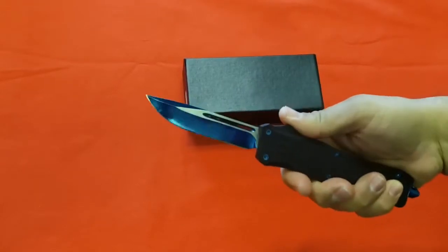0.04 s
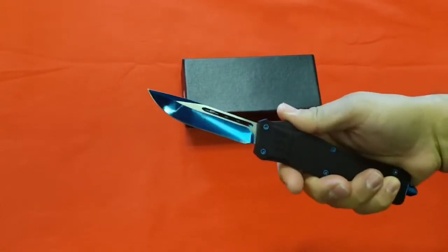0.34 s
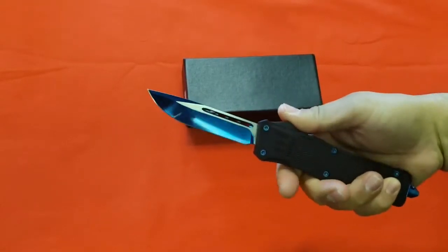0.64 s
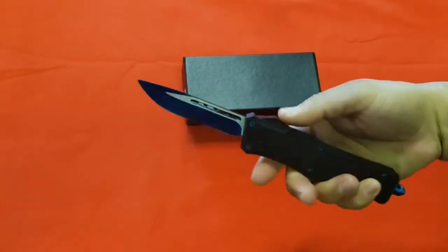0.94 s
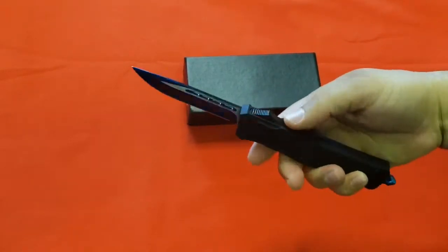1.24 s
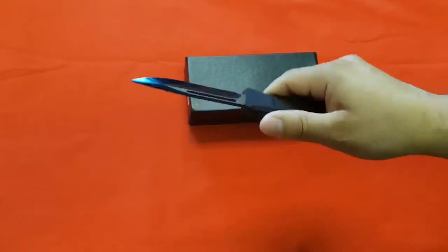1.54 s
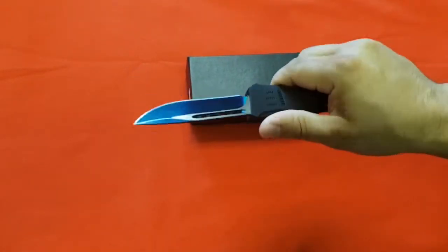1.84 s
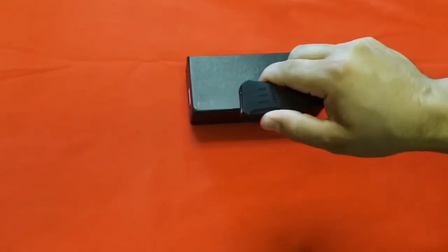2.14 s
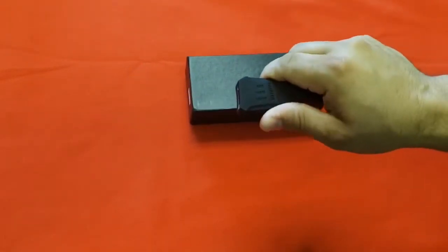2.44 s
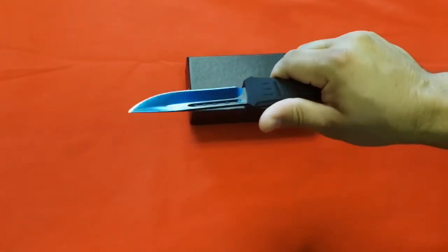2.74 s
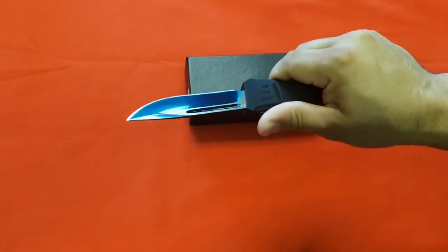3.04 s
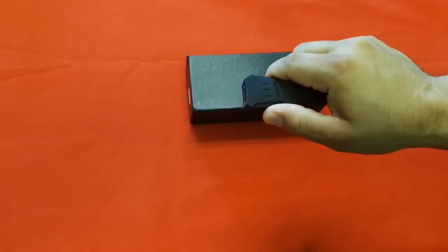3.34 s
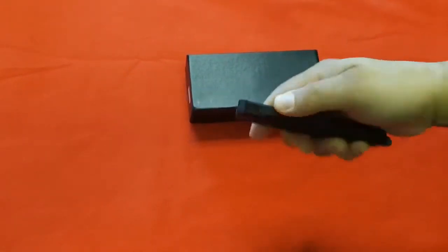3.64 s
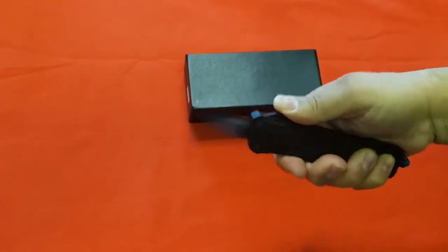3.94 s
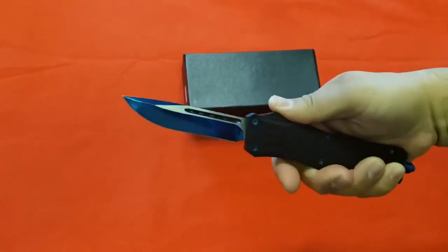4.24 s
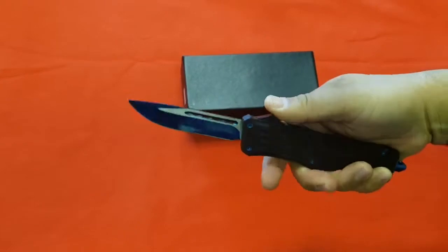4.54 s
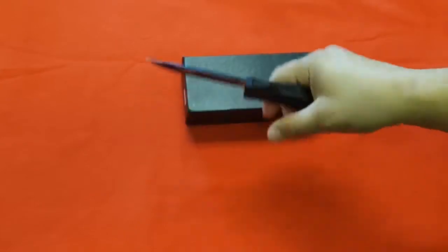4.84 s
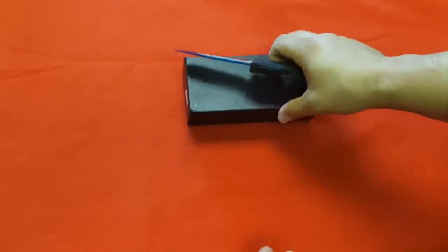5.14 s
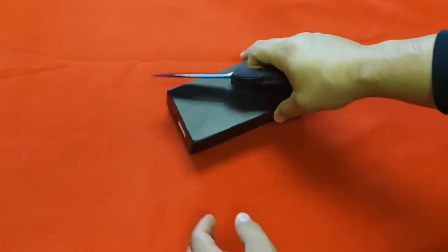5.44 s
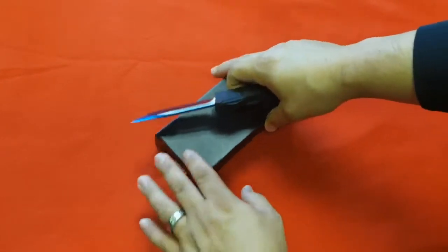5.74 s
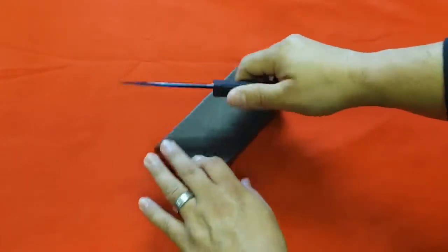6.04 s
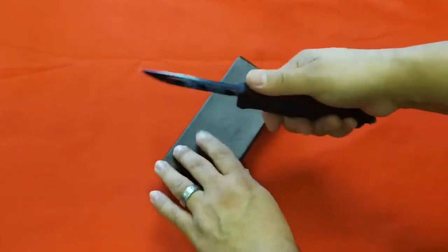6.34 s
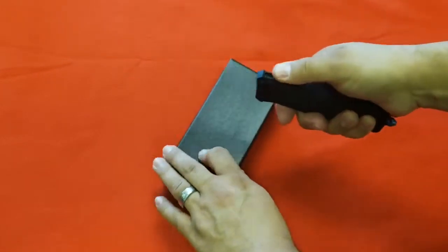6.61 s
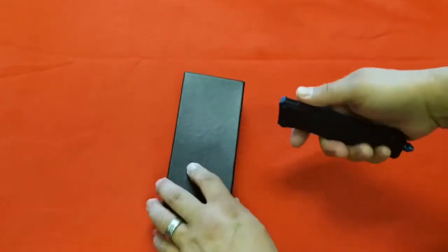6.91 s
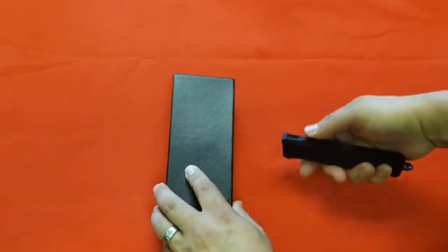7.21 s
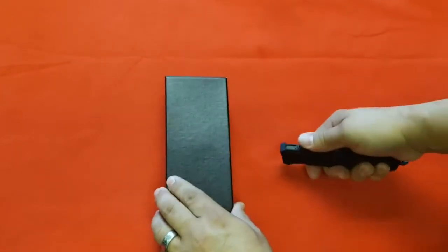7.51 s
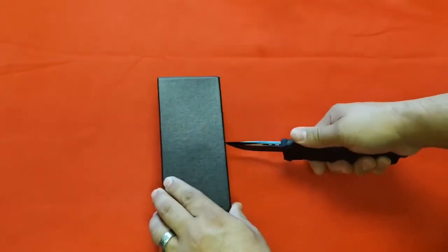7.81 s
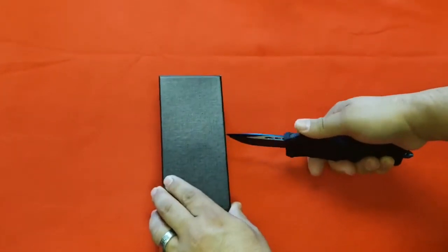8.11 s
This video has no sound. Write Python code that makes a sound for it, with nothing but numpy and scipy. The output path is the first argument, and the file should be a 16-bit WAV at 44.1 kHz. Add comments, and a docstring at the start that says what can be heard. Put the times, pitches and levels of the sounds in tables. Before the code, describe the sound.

A spring-loaded knife clicks once, close and left of centre. After a pause it snaps shut and open four times in all, each a sharp double click with a brief metallic ring. A cardboard box is softly bumped and slid over a cloth-covered table, with another snap midway. Finally the blade shoots into the box with a loud, hollow knock. The small room is quiet, with a low hum.

```python
"""A small, quiet room with a low hum; a stereo microphone close to a cloth-covered table, a bird far outside.
A spring-driven knife snaps, left of centre, and from 2 s is flicked open and shut four times: a latch
lets go, the blade grazes its channel and some 30 ms later bounces into its stop; spring and blade ring on.
From 5 s a cardboard box is knocked and shoved round on the cloth, with one more stroke in between.
At 7.8 s the last stroke shoots the blade into the box."""
import sys
import numpy as np
from scipy import signal
from scipy.fft import rfft, irfft, next_fast_len
from scipy.io import wavfile
from scipy.ndimage import uniform_filter1d

SR = 44100
rng = np.random.default_rng(int(sys.argv[2]) if len(sys.argv) > 2 else 0)


def output_pcm(signal):
    """Save a mono or channel-first signal as 16-bit PCM at the path in sys.argv[1].

    Samples are clipped to [-1, 1] before scaling.
    """
    pcm = np.clip(np.atleast_2d(signal).T, -1, 1) * 32767
    wavfile.write(sys.argv[1], SR, np.round(pcm).astype(np.int16))


N = 364707
LEAD = 4410  # samples ahead of time zero, for blows already sounding at the start
T = np.arange(SR // 2) / SR  # time axis of one blow [s]
GLIDE_ATTACK_S, GLIDE_RELEASE_S = 0.065, 0.45

# the spring launches the blade: (time [s], level [dB], low clack [dB], handle kick [dB],
# delay of the graze [s], graze [dB])
LAUNCHES = [(2.1181, -9, -3.5, -50, 0.018, -16.5), (2.7057, -8, -5.5, -44, 0.026, -19),
            (3.348, -8, -0.5, -43.5, 0.019, -21.5), (4.0143, -8, -1, -38.5, 0.024, -17),
            (6.645, -7, 1.5, -51.5, 0.019, -12.5), (7.7816, -11.5, 3, -48.5, 0.011, -24)]
# the blade hits its stop: (time [s], level [dB], loss per bounce [dB], low clack [dB], top sheen [dB],
# spring buzz [dB], free blade ring [dB], sheathed ring [dB], recoil [dB], handle note [Hz], handle [dB])
STOPS = [(-.003, -22, 2.7, -9.5, 2, -27, -66, -63.5, -48.5, 2183, -48.5),
         (2.1492, -8, 6.5, 0.5, -1, -21.5, -58.5, -54, -35.5, 1952, -32.5),
         (2.742, -12, 8.5, -0.5, 0.2, -27, -64, -45.5, -38, 2190, -40),
         (3.3764, -10, 4, 0.5, 2, -23.5, -69.5, -58, -38.5, 1883, -29.5),
         (4.0485, -5, 7.5, -3.5, -5.5, -27, -39.5, -61.5, -32, 2510, -31),
         (6.674, -14, 2.4, 4.5, 3.5, -20.5, -66.5, -49, -37.5, 2250, -39),
         (7.7991, -26.5, 3.5, 12, 3.2, -42.5, -66.5, -62, -49, 2100, -29.5)]
# crowded resonances of handle and slide: (frequency [Hz], gain [dB])
FRAME = [(60, -18.5), (200, -19.5), (600, -26), (1300, -29.5), (2000, -15.5), (2700, -14.5), (3700, -29),
         (4300, -16), (4850, 0.5), (5800, -1), (6900, 4), (8200, -20.5), (9300, -12.5), (12500, -6.5)]
# the microphone's right port faces away from the knife: (frequency [Hz], gain [dB])
SHADOW = [(150, -12), (1000, -11), (2100, -13), (2700, -14), (3900, 2.5), (4700, -4), (5600, -14.5),
          (6900, -19), (8200, -0.5), (9400, -3.5), (12000, -3)]


def knife():
    """Close up, on the left: steel cracks, each stop sets the parts ringing, the hand takes the recoil."""
    out = cracks()
    for s, *_, spring_db, blade_db, sheathed_db, recoil_db, handle_hz, handle_db in STOPS:
        buzz = amp(spring_db) * spring_buzz()
        steel = blade_ring(blade_db, sheathed_db)
        clack = amp(handle_db) * handle_clack(handle_hz)
        recoil = amp(recoil_db) * thump(hz=60.3, t60=0.11, pan_db=16.5)
        add(out, s, buzz + pan(5.7) * (steel + clack) + recoil)
    for s, _, _, kick_db, *_ in LAUNCHES:
        scrape = blow(colour(pair(len(T), .25) * fade(.012), FRAME))
        add(out, s - .005, amp(-35.5) * pan(5.8) * scrape)  # the latch slips off its seat first
        add(out, s, amp(kick_db) * thump(hz=81, t60=0.084, pan_db=11))
    return out


def cracks():
    """Each steel contact cracks through the hand-damped frame."""
    out = np.zeros((2, N + LEAD))
    for s, db, clack_db, sheen_db in contacts():
        strike = pair(len(T), 0.37) * fade(0.0047) + amp(-6.5) * crowd(count=36) * fade(.028)
        strike *= 1 - fade(0.0031)
        crack = blow(colour(strike[:, :SR // 12], FRAME))
        tone = [(3000, clack_db), (4500, 0.0016), (7500, 0), (11000, sheen_db)]
        add(out, s, amp(db) * colour(crack, tone))
    out[1] = colour(out[1], SHADOW)
    return out


def contacts():
    """Every touch of steel on steel: (time [s], level [dB], low clack [dB], top sheen [dB])."""
    for s, db, clack_db, _, graze_s, graze_db in LAUNCHES:
        yield s - .002, db - 7, -4, 3  # the latch tips
        yield from bounces(s, db, loss_db=11, clack_db=clack_db, sheen_db=-3, count=3)
        yield s + graze_s, graze_db, 4, 1.5  # the blade grazes its channel
    for s, db, loss_db, clack_db, sheen_db, *_ in STOPS:
        yield from bounces(s, db, loss_db, clack_db, sheen_db, count=5)


def bounces(s, db, loss_db, clack_db, sheen_db, count):
    """A blow and its rebounds, each weaker and duller than the last, at shrinking gaps."""
    first_gap_s, shrink, jitter_s, duller_db = .0038, .9, .0003, 1.17
    for k in range(count):
        yield s, db - k * loss_db, clack_db + k * duller_db, sheen_db
        s = s + first_gap_s * shrink ** k + jitter_s * rng.standard_normal()


def spring_buzz():
    """The coils ring and chatter in their channel, which roughens the sound."""
    # resonances of the spring: (frequency [Hz], gain [dB])
    spring_spectrum = [(100, -26), (700, -15.5), (1300, -20), (2100, -12.5), (3100, -23), (4000, -9),
                       (4800, -8), (5700, -6.5), (7000, 5.5), (8200, -16), (10000, -11.5), (12000, 0),
                       (13000, -9)]
    chatter = amp(2.5 * walk(180)[:len(T)])
    coils = (crowd(count=240) + 0.58 * pair(len(T), 0.095)) * chatter
    buzz = unit(colour(coils, spring_spectrum)) * fade(0.19) * (1 - fade(0.041))
    buzz[1] = colour(buzz[1], [(hz, 0.39 * db) for hz, db in SHADOW])  # only partly shadowed
    return buzz


def blade_ring(free_db, sheathed_db):
    """The struck blade rings on in long steel modes."""
    # modes of the blade, free and sheathed: (frequency [Hz], level [dB], t60 [s])
    free_modes = [(2178, -4, 0.52), (2220, -9.5, .4), (2360, -15, 0.56), (3390, -11.5, 0.16),
                  (4550, -9, 0.19), (4960, -13, .25), (6541, 6, .15), (11700, -2.5, .15)]
    sheathed_modes = [(4355, -11, 0.38), (4870, -14, 0.27), (7000, 3, .16), (10900, 1, .12),
                      (10400, 5.5, .1), (12400, -0.5, .17), (12820, -3, .15)]
    free = amp(free_db) * ring(free_modes, scatter_db=1.2, spread_rad=0.52)
    return free + amp(sheathed_db) * ring(sheathed_modes, scatter_db=2.5, spread_rad=1)


def handle_clack(hz):
    """The handle's hollow note, whose pitch depends on the grip."""
    return blow(colour(pair(len(T), 0.27) * fade(0.044), [(0.76 * hz, -40), (hz, 0), (1.5 * hz, -40)]))


def thump(hz, t60, pan_db):
    """The hand takes a jolt: a few slow swings and a dull thud of flesh."""
    flesh = [(50, -11), (110, -2), (190, -0.5), (300, -12.5), (650, -14), (1100, -35.5)]
    thud = unit(colour(pair(len(T), 0.29), flesh))
    swings = np.sin(2 * np.pi * hz * T) * fade(t60)
    return pan(pan_db) * (swings + amp(-4) * thud * fade(0.039))


def box_knocks():
    """Blade, handle and fingers hit the box, which answers with a short crack and its hollow modes."""
    # blows on the box: (time [s], level [dB], brightness [dB/octave], hollow ring re the crack [dB])
    box_blows = [(5.15, -62.5, 0, -6), (5.187, -41, -3.5, -3.5), (5.4913, -61, -0.5, -2),
                 (6.3517, -46, 1.5, -5), (6.4747, -48.5, -2, -7.5), (7.44, -55.5, -4.5, -3),
                 (7.4943, -45.5, 0.5, -8), (7.522, -59, 2.5, -12), (7.7982, -12.5, 1.5, -9),
                 (7.802, -8.5, 0.5, -3.5), (7.8064, -18, 1, -10), (7.824, -23, -1, -18)]
    # dull knock of cardboard: (frequency [Hz], gain [dB])
    card_spectrum = [(25, -33.5), (70, -13.5), (170, 2), (300, 3.5), (470, 0.5), (750, -4.5), (1200, -5.5),
                     (1700, -15), (2600, -18.5), (4000, -26.5), (8000, -39), (13000, -50.5)]
    # modes of the box: (frequency [Hz], level [dB], t60 [s])
    box_modes = [(173, -0.5, 0.13), (209, -5.5, 0.14), (374, -8.5, .08), (474.6, 1, 0.11), (604, -12, 0.18),
                 (792, -3, 0.069), (1167, -2.5, 0.093), (1340, -15, 0.11), (1570, -4.5, 0.038),
                 (1870, -12.5, 0.038), (2150, -5, 0.051), (2590, -17, 0.045)]
    out = np.zeros((2, N + LEAD))
    for s, db, tilt_db, hollow_db in box_blows:
        crack = blow(colour(pair(len(T), .92) * fade(0.02), card_spectrum))
        body = amp(hollow_db) * blow(ring(box_modes, scatter_db=0.94, spread_rad=0.11))
        add(out, s, amp(db) * colour(crack + body, [(125, -2 * tilt_db), (8000, 4 * tilt_db)]))
    right_port = [(200, -6), (500, -2), (650, -1), (850, -9.5), (1200, -20.5), (2500, -17), (6000, -2.5)]
    out[1] = colour(out[1], right_port)
    return colour(out, [(30, -19.5), (70, -3.5), (110, -0.5)])  # a small box radiates little bass


def sliding():
    """Card catches and slips on the weave in uneven grains, over a soft hiss of cloth."""
    # the box is shoved: (start [s], length [s], hollow rub [dB], rasp [dB])
    shoves = [(5.19, .11, -60, -81.5), (5.84, .045, -63.5, -80), (6.222, .06, -57, -59.5),
              (6.347, .015, -59.5, -63), (6.465, .025, -61.5, -77), (6.56, .045, -60, -63),
              (6.81, .025, -56.5, -61.5), (7.44, .05, -73.5, -83)]
    # sleeve, hand and box glide on the cloth: (start [s], length [s], hiss [dB], rasp [dB])
    glides = [(5.237, .1, -79.5, -86.5), (5.398, 0.5, -74.5, -88.5), (6.01, .02, -80.5, -87),
              (6.11, .16, -72.5, -80.5), (6.443, 0.25, -71.5, -78.5), (6.742, 0.21, -71, -74.5),
              (7.267, 0.048, -76.5, -79), (7.44, 0.071, -74.5, -87.5)]
    # the box's hollow rub, the card's rasp and the cloth's hiss: (frequency [Hz], gain [dB])
    rub_spectrum = [(100, -23.5), (220, -2.5), (380, 2.5), (480, 1.5), (600, -13.5), (900, -20.5),
                    (2000, -45)]
    rasp_spectrum = [(300, -24.5), (700, -2), (950, 0), (1500, -5.5), (2400, -2), (3000, -11.5),
                     (3800, -20.5), (5000, -20.5), (9000, -39)]
    cloth_spectrum = [(1180, -35.5), (2000, -3.5), (4300, -11), (6670, 7), (7420, -4), (8590, -27),
                      (10400, -13), (12500, -1.5), (13300, -8.5), (14000, -39)]
    rubbing, rasping, hissing = np.zeros((3, N))
    for s, length, rub_db, rasp_db in shoves:
        push = swell(s, length, attack_s=0.016, release_s=0.11)
        rubbing += amp(rub_db) * push
        rasping += amp(rasp_db) * push
    for s, length, hiss_db, rasp_db in glides:
        glide = swell(s, length, GLIDE_ATTACK_S, GLIDE_RELEASE_S)
        hissing += amp(hiss_db) * glide
        rasping += amp(rasp_db) * glide
        rubbing += amp(-79.5) * glide
    slips = amp(2.5 * walk(220))
    rub = unit(colour(pair(N, 0.95) * slips, rub_spectrum)) * rubbing
    rasp = unit(colour(pair(N, 0.34) * slips, rasp_spectrum)) * rasping
    hiss = unit(colour(pair(N, 0.14) * amp(1.5 * walk(40)), cloth_spectrum)) * hissing
    return pan(1.3) * (rub + rasp) + pan(2.7) * hiss


def table_rumble():
    """The table rumbles under the hands, in phase at both ports."""
    # course of the rumble: (time [s], level [dB])
    rumble_levels = [(5.1, -90), (5.3, -65.5), (5.9, -58.5), (6.1, -67), (6.5, -52.5), (6.9, -63),
                     (7.3, -70.5), (7.5, -55), (7.6, -83)]
    level = amp(np.interp(np.arange(N) / SR, *np.transpose(rumble_levels)))
    tabletop = [(30, -12), (70, -5), (100, 4), (150, -11), (300, -34.5), (600, -61)]
    return pan(1.3) * level * unit(colour(pair(N, 1), tabletop))


def grip():
    """A fingertip lands on the handle: a soft bump with a faint tick."""
    # the fingers shift: (time [s], thump [dB], tick [dB])
    touches = [(0.8924, -59.5, -63.5)]
    tick_spectrum = [(200, 8), (1000, 6), (3000, -10), (6000, -33.5)]
    out = np.zeros((2, N + LEAD))
    for s, thump_db, tick_db in touches:
        tick = blow(colour(pair(len(T), 0.33) * fade(0.033), tick_spectrum))
        add(out, s, amp(thump_db) * thump(hz=95, t60=0.14, pan_db=8) + amp(tick_db) * pan(11) * tick)
    return out


def fizz():
    """A thin hiss at the very top comes and goes."""
    # spells of hiss: (start [s], length [s], level [dB])
    spells = [(0.151, 0.65, -89), (2.849, 0.54, -77), (5.449, .4, -81), (6.848, .63, -78.5)]
    level = sum(amp(db) * swell(s, length, GLIDE_ATTACK_S, GLIDE_RELEASE_S) for s, length, db in spells)
    return level * unit(colour(pair(N, 0.19), [(8000, -29), (10500, -5), (12500, 0), (14000, -13.5)]))


def bird():
    """Thin whistles from far outside, blurred by the long way in to the microphone."""
    # rising notes and level notes: (time [s], starting pitch [Hz], relative level [dB])
    rising_notes = [(.194, 2006, -76), (.47, 2017, -74.5), (2.232, 2560, -80), (2.391, 2580, -84),
                    (2.835, 2850, -76.5), (3.06, 2590, -83), (5.968, 2470, -77), (6.143, 2416, -71.5),
                    (6.368, 2450, -69)]
    level_notes = [(.123, 2167, -78.5), (2.46, 3190, -78.5), (5.787, 2800, -78), (5.838, 2300, -73),
                   (6.048, 2290, -72), (6.45, 2270, -64.5)]
    rising_s, rising_ratio, level_s = .098, 1.09, 0.039
    out = np.zeros((1, N + LEAD))
    for notes, length, rise in (rising_notes, rising_s, rising_ratio), (level_notes, level_s, 1):
        for s, start_hz, db in notes:
            hz = start_hz * np.linspace(1, rise, int(length * SR))
            hz *= 1 + .025 * walk(250)[:len(hz)]
            whistle = np.hanning(len(hz)) ** .5 * np.sin(2 * np.pi * np.cumsum(hz) / SR)
            add(out, s, amp(db + 8) * whistle[None])
    echoes = pair(len(T), .3) * fade(.35)
    echoes /= np.sqrt(np.sum(echoes ** 2, axis=1, keepdims=True))
    return pan(3.6) * signal.fftconvolve(out, echoes, axes=1)[:, LEAD:LEAD + N]


def room_tone():
    """Low room rumble, with a faint, wavering hum to the left."""
    # tones of the hum: (frequency [Hz], level [dB])
    hum_tones = [(37.7, -79), (118.6, -67), (220.7, -80), (301.5, -87.5)]
    # the quiet room's noise: (frequency [Hz], gain [dB])
    floor_spectrum = [(12, -38), (20, -10.5), (90, -10.5), (122, -7.5), (136, -9.5), (148, -19.5),
                      (217, -12.5), (302, -26), (328, -32), (356, -30), (508, -44.5), (650, -39.5),
                      (7870, -55), (12500, -45), (14000, -67)]
    t = np.arange(N) / SR
    hum = np.zeros(N)
    for hz, db in hum_tones:
        level = amp(db + 1.8 * walk(5.7))
        hum += level * np.sqrt(2) * np.sin(2 * np.pi * hz * t + 0.41 * walk(3.2))
    rumble = amp(-66.5) * unit(colour(pair(N, 0.45), floor_spectrum))
    return pan(9.4) * hum + pan(1.9) * rumble


def room(x, wet_db, t60):
    """Near walls return a short diffuse tail, starting 6 ms after the direct sound."""
    tail = pair(len(T), .15) * fade(t60) * np.clip((T - .006) / .012, 0, 1)
    tail /= np.sqrt(np.sum(tail ** 2, axis=1, keepdims=True))
    tail = colour(tail, [(150, 1.5), (500, 4), (1500, 1), (4000, 0), (7000, -1.5), (12000, -6.5)])
    wet = signal.fftconvolve(x.mean(axis=0, keepdims=True), tail, axes=1)[:, :x.shape[1]]
    return x + amp(wet_db) * pan(4) * wet


def ring(modes, scatter_db, spread_rad):
    """Struck modes; their strengths, and their lag between the ports, vary with the spot that is hit."""
    out = 0
    for hz, db, t60 in modes:
        strength, lag = rng.standard_normal(2)
        phase = spread_rad * lag * np.array([[1], [-1]])
        out = out + amp(db + scatter_db * strength) * fade(t60) * np.sin(2 * np.pi * hz * T + phase)
    return out


def crowd(count):
    """Many close steel modes of uneven strength, each reaching the two ports in its own phase."""
    spectrum = np.zeros((2, len(T) // 2 + 1), complex)
    bins = ((np.arange(count) + rng.random(count)) / count * (len(T) // 2)).astype(int)
    spectrum[:, bins] = rng.rayleigh(size=count) * np.exp(2j * np.pi * rng.random((2, count)))
    return unit(irfft(spectrum, len(T)))


def colour(x, points):
    """Minimum-phase filter through points of (frequency [Hz], gain [dB])."""
    size = 2 * next_fast_len(x.shape[-1] // 2 + 2048)
    hz, db = np.transpose(points)
    f = np.maximum(np.arange(size // 2 + 1) * SR / size, 1)
    cepstrum = irfft(np.interp(np.log(f), np.log(hz), db) * np.log(10) / 20)
    cepstrum[1:size // 2] *= 2
    cepstrum[size // 2 + 1:] = 0
    return irfft(rfft(x, size) * np.exp(rfft(cepstrum)))[..., :x.shape[-1]]


def swell(s, length, attack_s, release_s):
    """Rise up to time s, hold, then fall 60 dB in release_s."""
    t = np.arange(N) / SR - s
    rise = np.clip(1 + t / attack_s, 0, 1) ** 2
    return rise * np.exp(-np.log(1000) * np.maximum(t - length, 0) / release_s)


def fade(t60):
    """Decay by 60 dB in t60 seconds."""
    return np.exp(-np.log(1000) * T / t60)


def pair(size, alike):
    """Left and right noise sharing the fraction `alike` of their power."""
    noise = rng.standard_normal((3, size))
    return np.sqrt(alike) * noise[0] + np.sqrt(1 - alike) * noise[1:]


def walk(rate_hz):
    """Random wavering at rms 1."""
    step = int(SR / rate_hz)
    return unit(uniform_filter1d(np.repeat(rng.standard_normal(N // step + 1), step), step)[:N])


def pan(db):
    """Gains that put the left db above the right."""
    return amp(np.array([[db], [-db]]) / 2)


def amp(db):
    """Decibels to gain."""
    return 10 ** (np.asarray(db) / 20)


def unit(x):
    """Scale to rms 1."""
    return x / np.sqrt(np.mean(x ** 2, axis=-1, keepdims=True))


def blow(x):
    """Scale to the energy of 2 ms at rms 1."""
    return x * np.sqrt(.002 * SR / np.sum(x ** 2, axis=-1, keepdims=True))


def add(out, s, sound):
    """Mix a sound in at time s, on a track that starts LEAD samples early."""
    start = max(int(s * SR) + LEAD, 0)
    part = out[:, start:start + sound.shape[-1]]
    part += sound[:, :part.shape[-1]]


def scene():
    """Knife and box close by in the small room; bird and room tone behind them."""
    blows = room(knife() + box_knocks() + grip(), wet_db=-13.5, t60=0.25)[:, LEAD:]
    return blows + sliding() + table_rumble() + fizz() + bird() + room_tone()


def record(dry):
    """The microphone drops the deepest bass, rounds the loudest peaks and cuts the top steeply."""
    bass_hz, ceiling, edge_hz, top_hz = 28, 1.15, 13150, 14357
    bassless = signal.sosfilt(signal.butter(2, bass_hz, "high", fs=SR, output="sos"), dry)
    rounded = ceiling * np.tanh(bassless / ceiling)
    dulled = signal.sosfilt(signal.ellip(8, .3, 30, edge_hz, fs=SR, output="sos"), rounded)
    return signal.sosfilt(signal.ellip(8, .2, 70, top_hz, fs=SR, output="sos"), dulled)


dry = scene()
out = record(dry)
output_pcm(out)
```